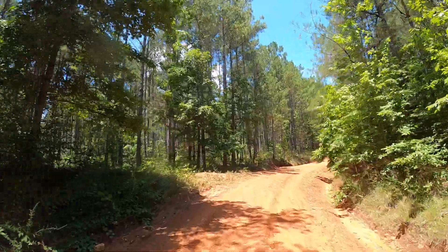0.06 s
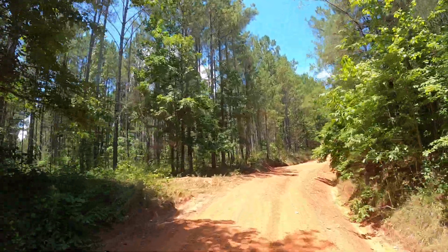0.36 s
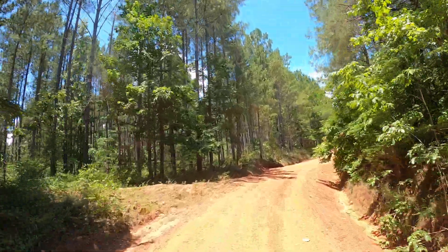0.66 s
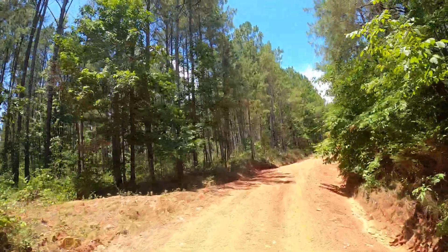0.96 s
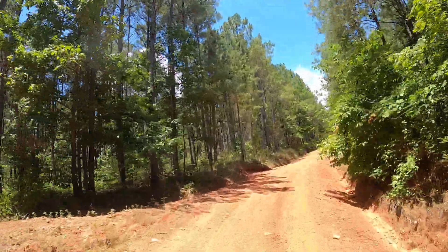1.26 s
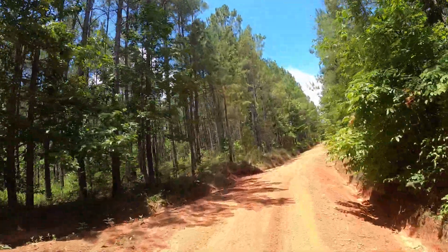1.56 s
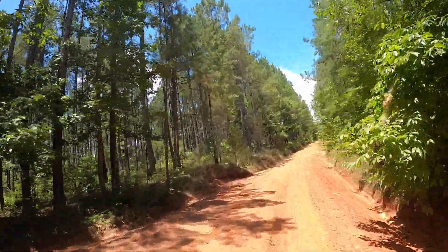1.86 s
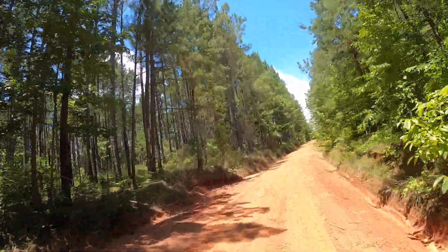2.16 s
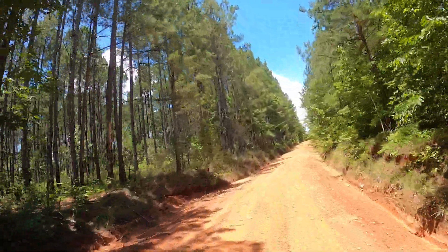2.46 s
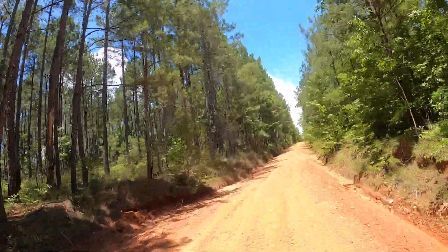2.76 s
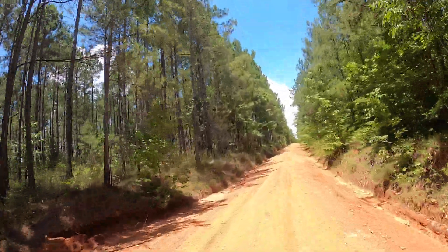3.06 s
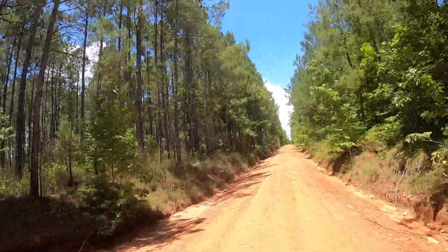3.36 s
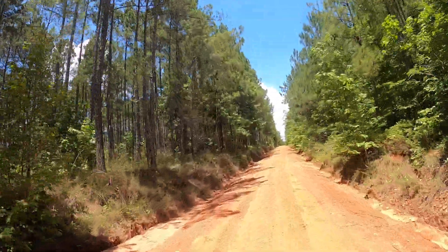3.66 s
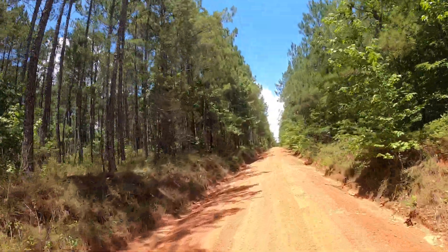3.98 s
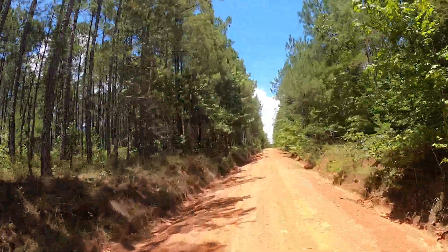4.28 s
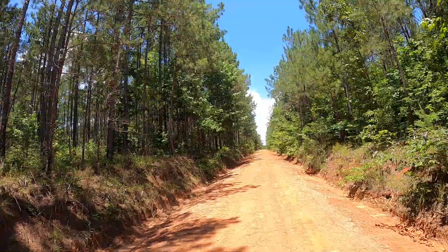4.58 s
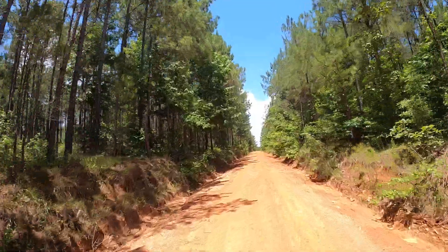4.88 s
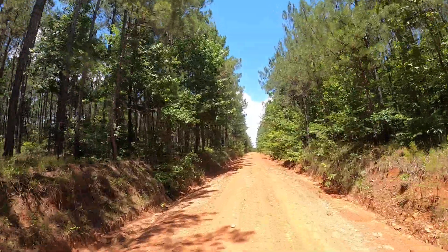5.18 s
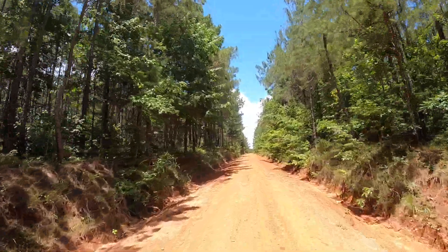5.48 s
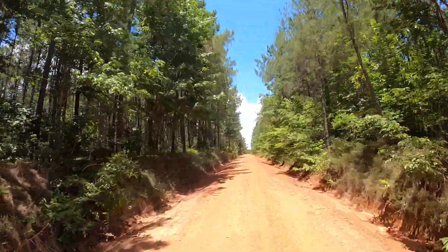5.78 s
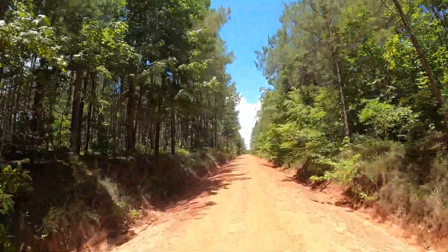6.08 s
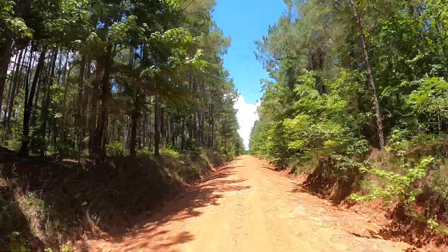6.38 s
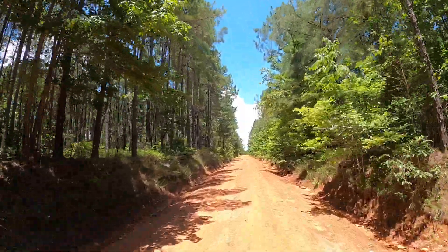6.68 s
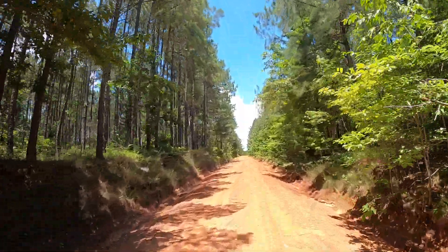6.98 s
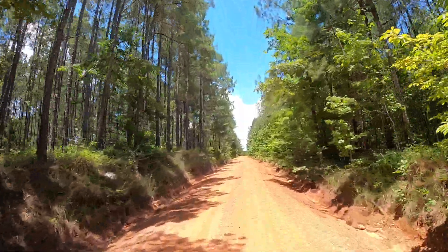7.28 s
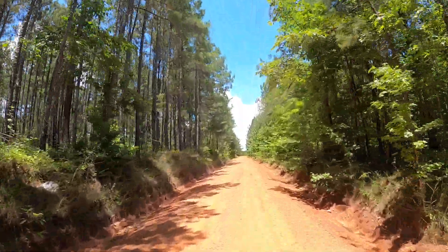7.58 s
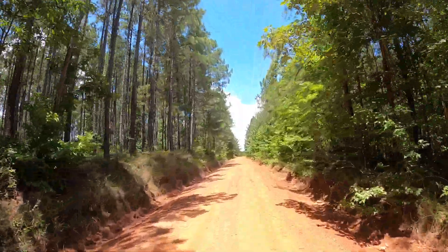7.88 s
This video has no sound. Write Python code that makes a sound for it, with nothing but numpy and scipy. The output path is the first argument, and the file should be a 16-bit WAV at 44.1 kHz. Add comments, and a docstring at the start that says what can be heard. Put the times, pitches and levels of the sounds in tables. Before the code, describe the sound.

A car engine drones steadily over tyre rumble on a dirt road, heard from inside, with light rattles and a few plastic knocks.

```python
"""An engine drones at a nearly steady speed over tyre rumble and a hiss of grit: a car cruising on a
dirt road, heard from a microphone at the dashboard. The drone is the crankshaft's orders; the road
comes up through the springs and body panels, and sand sprays the wheel wells. Close by in the cabin,
bumps set a small hard part rattling and now and then knock the plastic trim."""
import sys
import numpy as np
from scipy import signal
from scipy.fft import rfft, irfft, next_fast_len
from scipy.io import wavfile

SR = 44100
rng = np.random.default_rng(int(sys.argv[2]) if len(sys.argv) > 2 else 0)


def pcm_store(signal):
    """Save signal as 16-bit PCM."""
    levels = np.round(np.clip(np.atleast_2d(signal), -1, 1) * 32767)
    wavfile.write(sys.argv[1], SR, levels.astype(np.int16).T)


N = 358956
TIME = np.arange(N) / SR

# the crankshaft: (time [s], speed [turns/s])
CRANK_SPEED = [(0, 34.4), (1.4, 34.45), (1.8, 34.75), (2.1, 34.5), (3, 34.86), (3.8, 34.61), (4.7, 35.38),
               (5.3, 35.24), (6.1, 35.46), (7, 34.83), (7.8, 34.84), (8.14, 35.2)]
# the drone in the cabin: (time [s], second order level [dB], third order level [dB])
DRONE_LEVELS = [(0, -21, -19), (0.3, -20, -17.5), (1.6, -19.5, -19.0), (2.4, -20.0, -16.5),
                (3.15, -19.5, -16.5), (3.5, -16, -20.0), (4, -19, -17), (5.7, -17, -17.0), (7, -18, -18),
                (7.8, -20, -17), (8.14, -17, -16)]
# the other engine orders: (multiple of crank speed, level [dB])
ENGINE_ORDERS = [(1, -27.5), (3.5, -39), (4, -38.5), (5.5, -41), (6, -26), (7, -44), (8, -41), (9, -48.5),
                 (10, -37.5), (11, -43.5), (12, -50), (14, -47), (15, -45.5), (16, -49), (17, -54),
                 (18, -49), (19, -55.5), (20, -54), (30, -52.5)]
# rough spots in the road: (time [s], length [s], rise of the tyre roar [dB])
ROUGH_SPOTS = [(.27, .28, 3), (1.52, 0.59, 2.5), (2.928, 0.2, 4), (3.3, 0.31, 3), (3.597, 0.16, 3),
               (4.684, 0.23, 2.5), (5.067, .3, 1), (5.467, 0.18, 3), (6.7, .4, 2.5), (7.77, 0.38, 2.5)]
# road rumble, tyre roar and grit, heard through the car's body: (frequency [Hz], relative level [dB])
RUMBLE_SPECTRUM = [(4, -12), (14, -6), (25, -1), (48, -1), (85, 0), (120, 0.5), (155, -2.5), (190, -7.5),
                   (230, -7.5), (290, -17.5), (420, -38.5)]
ROAR_SPECTRUM = [(180, -21.5), (280, 1.5), (370, 3.5), (450, -0.5), (530, -3.5), (680, -2), (810, -6.5),
                 (1100, -14), (1300, -17), (1650, -20), (2200, -26), (4000, -39.5)]
GRIT_SPECTRUM = [(700, -17), (1400, 6), (2000, 1.5), (2600, 1), (3200, -2.5), (4200, -7.5), (5000, -13),
                 (6200, -16), (7700, -25), (8600, -16.5), (9800, -27), (12000, -35), (15000, -43)]
# panels that the road keeps humming: (frequency [Hz], width [Hz], level against the roar [dB])
PANEL_MODES = [(521, 41, -11), (901, 43, -20), (1130, 32, -18.5), (1354, 82, -22), (1666, 84, -29.5)]
# loose sand on the road: (time [s], relative level [dB])
SAND_LEVELS = [(0.0, -46), (2.83, -48), (3.06, -46.5), (4.26, -50), (4.83, -46), (6.08, -49), (6.96, -44.5),
               (7.52, -48.5), (8.14, -45.5)]
# strikes of the loose part: (time [s], relative level [dB])
RATTLE_STRIKES = [(0.2047, -31.5), (0.2724, -35.5), (.3097, -41), (.3531, -40.5), (.5116, -44),
                  (1.005, -35.5), (1.1646, -34), (1.3179, -38), (1.3992, -35.5), (1.484, -36),
                  (1.5647, -39), (1.6785, -41), (1.752, -46), (2.007, -40), (2.365, -37), (2.4213, -34.5),
                  (3.22, -33), (3.557, -32.5), (3.6437, -37.5), (3.8132, -33), (4.233, -34), (5.0509, -30),
                  (5.3457, -30.5), (5.5112, -33.5), (6.2672, -31.5), (6.628, -41.5), (6.7144, -39.5),
                  (6.8066, -35), (6.9232, -45), (6.987, -37), (7.7406, -33), (7.793, -43)]
# bounces and reflections within one strike: (delay [s], gain)
BOUNCES = [(0, .5), (.0018, .85), (.0046, .45), (.0091, .75), (.0138, .42), (.0185, .25)]
# the crack of its contact: (frequency [Hz], relative level [dB])
CRACK_SPECTRUM = [(600, 0), (1700, 3.5), (2200, -4), (2900, -1), (3600, 5), (4500, -5), (5100, -6),
                  (7300, -13.5), (8700, -12.5), (10100, -15), (10700, -21), (12000, -23), (13800, -28.5),
                  (15000, -40)]
# its ring: (frequency [Hz], relative level [dB], t60 [s])
LOOSE_PART_MODES = [(662, -2, .08), (1361, -10, .06), (1684, -1, .07), (1857, -8, .035), (2018, -10, .035),
                    (2540, -9, .04), (2702, -11, .035), (3307, -5, .06), (3434, -3, .06), (3601, -4, .06),
                    (3779, -2, .05), (3967, -9, .04), (4200, -9, .035), (4548, -11, .04), (5560, -10, .065),
                    (5881, -18, .05), (6804, -18, .035), (8688, -16, .03), (10023, -14, .035),
                    (11773, -25, .03)]
# knocks in the trim: (time [s], relative level [dB], lift of the low thud [dB], pitch factor)
TRIM_KNOCKS = [(1.442, -18, 0.5, 0.95), (1.5235, -18.5, 4, 0.96), (2.522, -21, 2, 0.95),
               (3.296, -20, 1, 1.36), (3.569, -27, 11, 1.05)]
# the trim's ring at pitch factor one: (frequency [Hz], relative level [dB], t60 [s])
PLASTIC_MODES = [(480, 0, .05), (660, -2, .05), (1050, -4, .02), (1450, -5, .016), (1830, 0, .02),
                 (2080, 1, .018), (2400, -5, .015)]


def amp(db):
    """Decibels to gain."""
    return 10 ** (np.asarray(db) / 20)


def unit(x):
    """Scales to an rms of one."""
    return x / np.sqrt(np.mean(x ** 2) + 1e-20)


def curves(rows):
    """Each column of a table as a line through time."""
    times, *columns = np.transpose(rows)
    return [np.interp(TIME, times, column) for column in columns]


def colour(x, spectrum):
    """Filters by a spectrum drawn on a log-frequency axis, falling 12 dB an octave past its ends."""
    hz, db = np.transpose(spectrum)
    size = next_fast_len(len(x))
    bins = np.fft.rfftfreq(size, 1 / SR)
    gain = amp(np.interp(np.log(bins + 1), np.log(hz), db))
    gain *= np.minimum(1, bins / hz[0]) ** 2 * np.minimum(1, hz[-1] / (bins + 1)) ** 2
    return irfft(rfft(x, size) * gain, size)[:len(x)]


def wander(rate_hz):
    """A slow random drift with an rms of one."""
    t = TIME[::100]
    bins = np.fft.rfftfreq(len(t), t[1])
    slow = irfft(rfft(rng.standard_normal(len(t))) / (1 + (bins / rate_hz) ** 4), len(t))
    return np.interp(TIME, t, unit(slow))


def hum(hz, width_hz):
    """Noise held in one resonance."""
    return unit(signal.lfilter(*signal.iirpeak(hz, hz / width_hz, SR), rng.standard_normal(N)))


def ring(modes, t, low_db, split_hz):
    """Dying modes of a struck part, those under split_hz lifted by low_db."""
    hz, db, t60 = np.transpose(modes)[:, :, None]
    db = db + low_db * (hz < split_hz)
    sign = (-1) ** np.arange(len(hz))[:, None]
    decay = np.exp(-np.log(1000) * t / t60)
    return (sign * amp(db) * decay * np.sin(2 * np.pi * hz * t)).sum(0)


def cabin(x, tail_db, t60):
    """The direct sound at the microphone, then the short tail of an upholstered cabin."""
    t = np.arange(SR // 5) / SR
    tail = unit(rng.standard_normal(len(t)) * np.exp(-np.log(1000) * t / t60))
    response = amp(tail_db) * tail / np.sqrt(len(t))
    response[0] = 1
    return signal.oaconvolve(x, response / np.linalg.norm(response))[:N]


def engine(speed, turns, fifth_peak_db=-24, cabin_hz=172, cabin_width_hz=8):
    """Whole and half orders of the crankshaft; the low ones stand firm, the high ones waver."""
    second_db, third_db = curves(DRONE_LEVELS)
    # the fifth order fades as speed lifts it off a cabin resonance
    detuning = 2 * (5 * speed - cabin_hz) / cabin_width_hz
    fifth_db = fifth_peak_db - 10 * np.log10(1 + detuning ** 2)
    out = np.zeros(N)
    for order, db in [(2, second_db), (3, third_db), (5, fifth_db)] + ENGINE_ORDERS:
        waver = 0.052 if order <= 3 else 0.25 if order <= 6 else 0.41
        angle = 2 * np.pi * (order * turns + rng.random())
        tone = (1 + waver * wander(rate_hz=3.33)) * np.cos(angle)
        phase_wobble = waver * wander(rate_hz=5) * np.sin(angle)
        out += amp(db) * (tone + phase_wobble)
    return out


def whine(speed, turns, level_db=-46, waver=0.074, order=25, panel_hz=884, width_hz=26):
    """A high engine order swells whenever its pitch meets a panel resonance."""
    response = 1 / (1 + 2j * (order * speed - panel_hz) / width_hz)
    flutter = 1 + waver * (wander(rate_hz=3.8) + 1j * wander(rate_hz=8.1))
    return amp(level_db) * (response * flutter * np.exp(2j * np.pi * order * turns)).real


def jolts():
    """The road's lift of the roar, in dB: each rough spot swells and dies as the wheels cross it."""
    return sum(db * np.exp(-(2 * (TIME - at) / length) ** 2) for at, length, db in ROUGH_SPOTS)


def road_rumble(jolt_db, smooth_road_db=-24.5, jolt_share=0.44):
    """Rumble comes up through the springs, more on the rough spots."""
    rumble = unit(colour(rng.standard_normal(N), RUMBLE_SPECTRUM))
    return amp(smooth_road_db + jolt_share * jolt_db) * rumble


def tyre_boom(speed, cruise_turns_per_s=35, cruise_db=-33, db_per_crank_hz=6):
    """The air inside the tyres resonates, booming louder with speed."""
    boom = colour(hum(hz=187, width_hz=12), [(150, 0), (230, 0)])
    return amp(cruise_db + db_per_crank_hz * (speed - cruise_turns_per_s)) * boom


def tyres(turns, jolt_db, roar_db=-35, grit_db=-3.5, throb_depth=0.076, grains_per_s=700, grains_db=-9):
    """Roar through the panels, and sand thrown against the wheel wells; both rise on the rough spots."""
    roar = unit(colour(rng.standard_normal(N), ROAR_SPECTRUM))
    panels = sum(amp(db) * hum(hz, width) for hz, width, db in PANEL_MODES)
    roar += colour(panels, [(400, 0.0049), (1800, 0.015)])
    # the engine's shaking makes the roar throb in step with the crank
    crank = 2 * np.pi * turns
    throb = 1 + throb_depth * (np.cos(crank) + np.cos(2 * crank) / 2 + np.cos(3 * crank) / 2)
    flicker_db = 1.24 * wander(rate_hz=15)
    roar *= throb * amp(roar_db + jolt_db + flicker_db)

    sand_db, = curves(SAND_LEVELS)
    grains = (rng.random(N) < grains_per_s / SR) * rng.standard_normal(N)
    hiss = unit(colour(rng.standard_normal(N), GRIT_SPECTRUM))
    ticks = unit(cabin(colour(grains, GRIT_SPECTRUM), tail_db=-2, t60=0.085))
    sand = hiss + amp(grains_db) * ticks
    return roar + sand * amp(sand_db + grit_db + 0.3 * jolt_db + flicker_db / 2)


def rattle(ring_db=-7, tail_db=-6, tail_t60=0.16, crack_s=0.0017, touch_s=0.0022, middling_db=-34):
    """A small hard part chatters on its seat close by: clusters of gritty cracks over a brief ring."""
    t, out = np.arange(SR // 6) / SR, np.zeros(N)
    onset = 1 - np.exp(-t / touch_s)
    bounce_power = sum(gain ** 2 * (t >= delay) * np.exp(-2 * abs(t - delay) / crack_s)
                       for delay, gain in BOUNCES)
    cabin_tail = amp(tail_db - 60 * t / tail_t60) * onset
    graze = np.minimum(t / touch_s, 1)  # it grazes before it lands
    envelope = np.sqrt(bounce_power + cabin_tail ** 2) * graze
    shared_noise = rng.standard_normal(len(t))  # keeps the strikes nearly alike
    for at, db in RATTLE_STRIKES:
        contact = unit(shared_noise + 0.32 * rng.standard_normal(len(t)))
        crack = colour(envelope * contact, CRACK_SPECTRUM)
        low_db = 9.5 + 0.4 * (db - middling_db)  # a harder strike brings out the low ring
        modes = ring(LOOSE_PART_MODES, t, low_db, split_hz=2200) * onset ** 2
        add(out, at - 0.001, amp(db) * (2 * crack + amp(ring_db) * modes))
    return out


def knocks(gain_db=-5.5, snap_db=-6, snap_s=0.002, onset_s=0.0017):
    """Plastic trim knocks against the car's body: a dry snap and a short ring in the cabin."""
    t, out = np.arange(SR // 8) / SR, np.zeros(N)
    onset = 1 - np.exp(-t / onset_s)
    for at, db, thud_db, pitch in TRIM_KNOCKS:
        burst = rng.standard_normal(len(t)) * np.exp(-t / snap_s)
        snap = colour(burst, [(600, 17.5), (2300, 5.5), (4000, -1), (7000, -12), (9000, -25.5)])
        modes = ring(PLASTIC_MODES, t * pitch, thud_db, split_hz=900) * onset
        add(out, at, amp(db + gain_db) * (modes + amp(snap_db) * snap))
    return cabin(out, tail_db=-1.5, t60=0.086)


def add(mix, at_s, sound):
    """Lays a sound into the mix at a time."""
    part = mix[max(round(at_s * SR), 0):][:len(sound)]
    part += sound[:len(part)]


def scene():
    """Engine, road and loose parts as they reach the dashboard, in mono."""
    speed, = curves(CRANK_SPEED)
    turns = np.cumsum(speed) / SR
    jolt_db = jolts()
    motor = engine(speed, turns) + whine(speed, turns)
    road = road_rumble(jolt_db) + tyre_boom(speed) + tyres(turns, jolt_db)
    return (motor + road + rattle() + knocks())[None]


def record(dry):
    """The microphone at the dashboard, with a steep cut of the highest treble."""
    edge_hz = 15200
    lowpass = signal.firwin(511, edge_hz, window=("kaiser", 9), fs=SR)
    return signal.oaconvolve(dry, lowpass[None], "same")


dry = scene()
out = record(dry)
pcm_store(out)
```